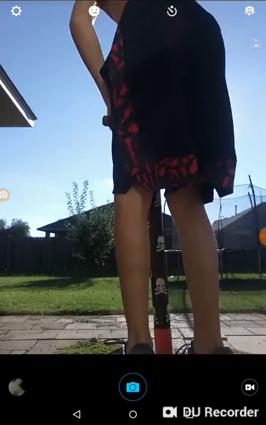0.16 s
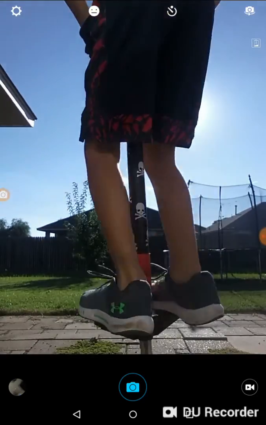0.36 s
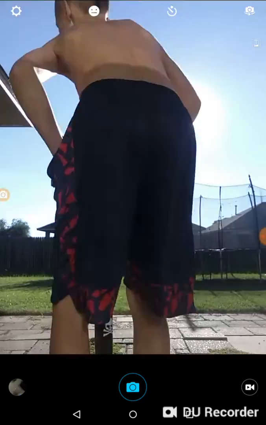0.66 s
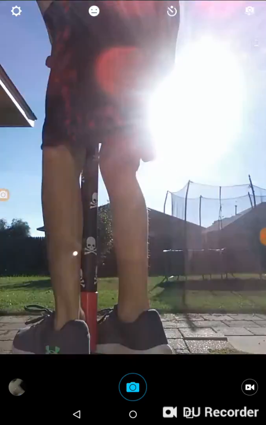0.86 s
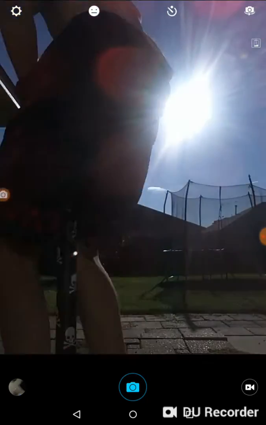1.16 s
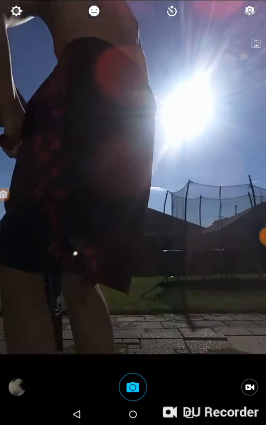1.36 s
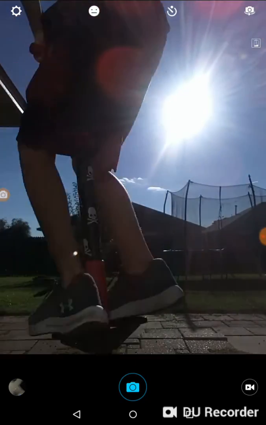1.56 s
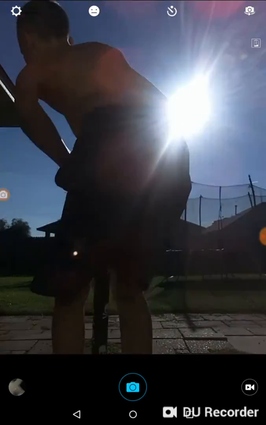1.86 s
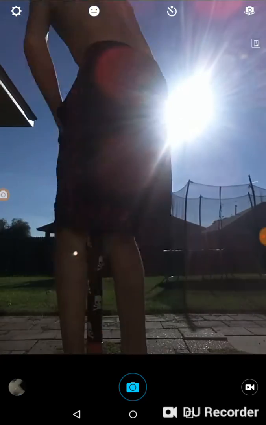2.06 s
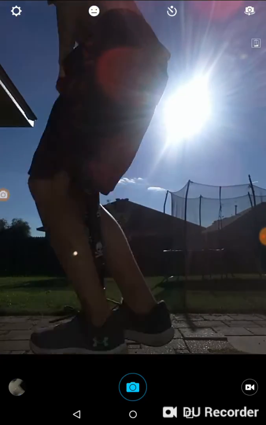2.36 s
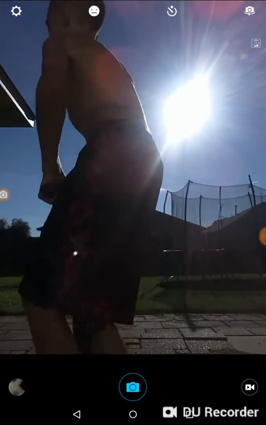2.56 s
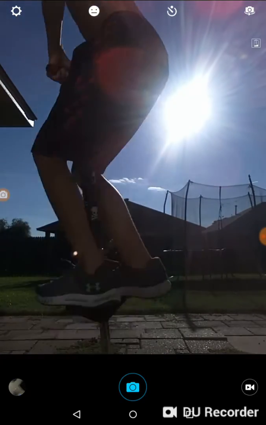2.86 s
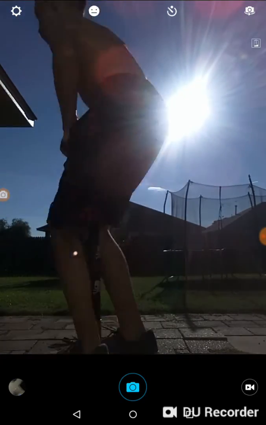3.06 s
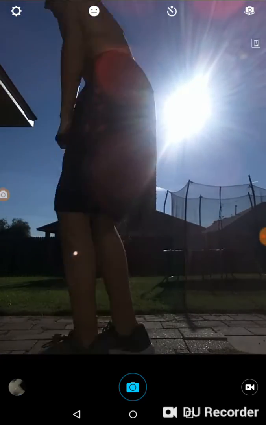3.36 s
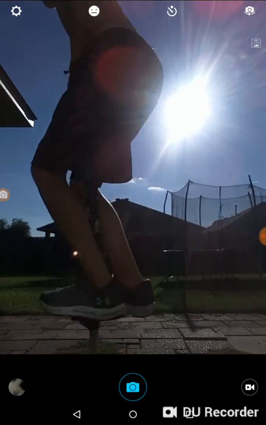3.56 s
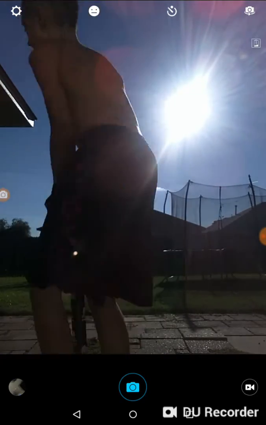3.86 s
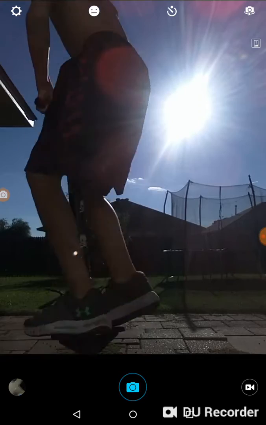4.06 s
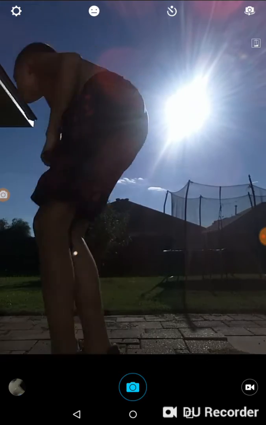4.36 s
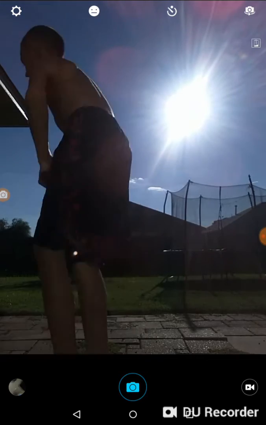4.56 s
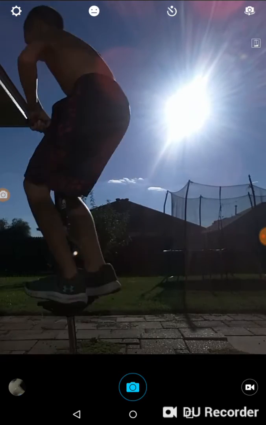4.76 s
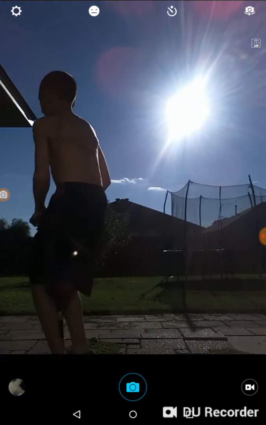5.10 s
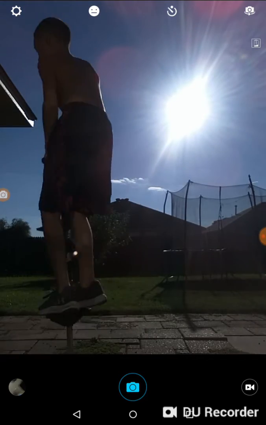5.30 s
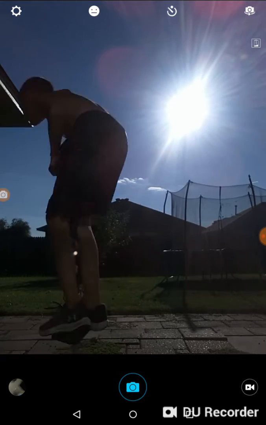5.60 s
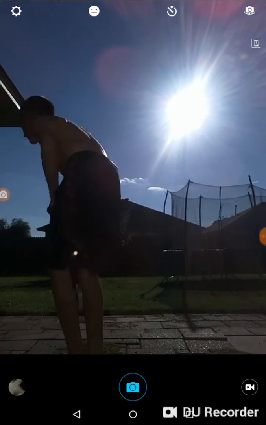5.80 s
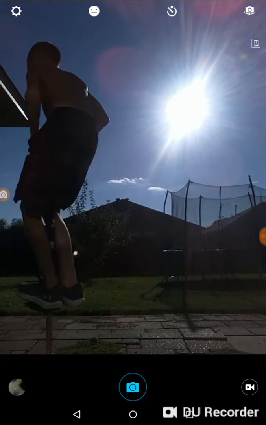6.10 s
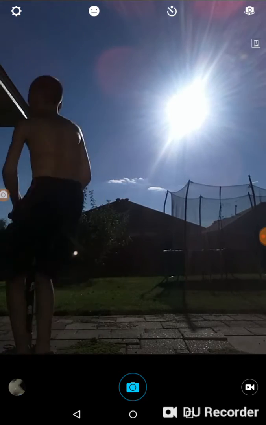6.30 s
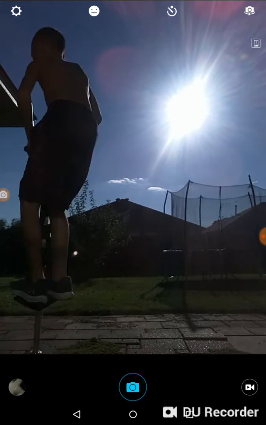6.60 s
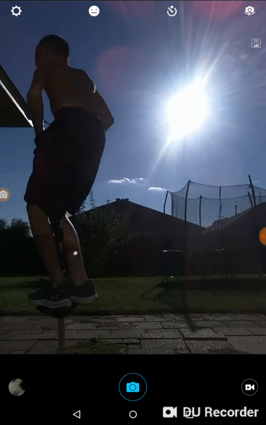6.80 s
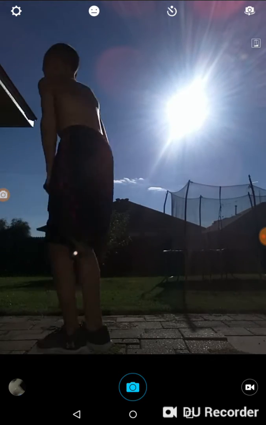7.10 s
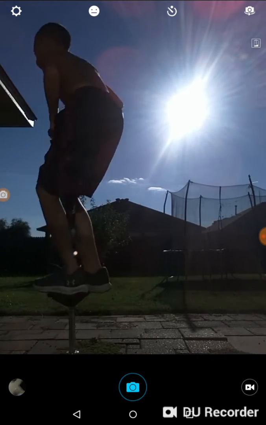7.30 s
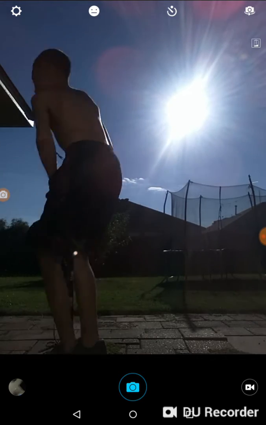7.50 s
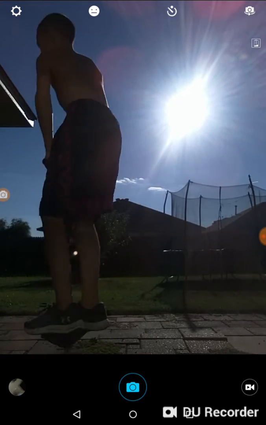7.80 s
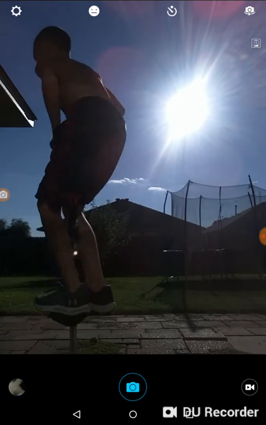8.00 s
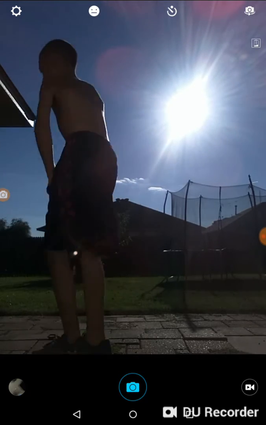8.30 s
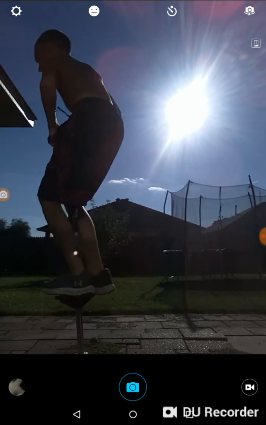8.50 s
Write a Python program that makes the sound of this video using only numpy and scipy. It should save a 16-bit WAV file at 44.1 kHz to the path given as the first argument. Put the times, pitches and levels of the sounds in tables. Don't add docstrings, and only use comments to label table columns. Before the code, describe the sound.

A pogo stick bounces steadily on patio slabs, each landing a sharp metallic clack with spring chatter, a dull thud and a rattling top-stop slam.

```python
import sys
import numpy as np
from scipy import signal
from scipy.fft import rfft, irfft
from scipy.io import wavfile
from scipy.ndimage import uniform_filter1d, minimum_filter1d

SR = 44100
rng = np.random.default_rng(int(sys.argv[2]) if len(sys.argv) > 2 else 0)


def volts_from_db(level):
    exponent = np.asarray(level, float) / 20
    return 10 ** exponent


def log_audio(samples):
    frames = np.atleast_2d(samples).T
    limited = np.clip(frames, -1, 1)
    pcm = np.round(limited * 32767).astype(np.int16)
    wavfile.write(sys.argv[1], SR, pcm)


N = 381465

# start_s, peak_db, bright_db, chatter_held_s, chatter_t60_s (time to die by 60 dB)
TOP_STOPS = [(0.149, -8, -5, 0.0085, 0.14), (0.794, -11.5, -10.5, 0.0048, 0.21),
             (1.448, -4.5, -8, 0.0074, 0.1), (2.093, -7, -3.5, 0.0037, 0.113),
             (2.723, -13.5, -12, 0.014, 0.23), (3.362, -13.5, -14, 0.012, 0.19),
             (4.0, -11.5, -9.5, 0.007, 0.2), (4.629, -9.5, -9, 0.0039, 0.2),
             (5.261, -11, -10.5, 0.0049, 0.183), (5.911, -8.5, -11.5, 0.0032, 0.17),
             (6.513, -6.5, -4.5, 0.0015, 0.15), (7.142, -10.5, -7, 0.0043, 0.16),
             (7.751, -11, -12, 0.0061, 0.17), (8.354, -14, -9.5, 0.011, 0.18)]
# full_drag_s, rub_db, whine_db
REBOUNDS = [(0.127, -35, -42.5), (0.731, -35, -47), (1.39, -37.5, -39.5), (2.04, -37.5, -61.5),
            (2.67, -37.5, -51.5), (3.28, -39.5, -42), (3.97, -36, -56.5), (4.57, -40, -60),
            (5.16, -40, -56.5), (5.849, -45, -64), (6.47, -41, -54.5), (7.1, -37, -45), (7.71, -38.5, -55),
            (8.28, -42.5, -54)]
# rub_settles_s, rub_db, whine_settles_s, whine_db
FLIGHTS = [(.31, -46, 0.53, -60.5), (.94, -44, 0.892, -47), (1.62, -38, 2.4, -52),
           (2.21, -40, 2.917, -46.5), (2.86, -41, 3.3, -65.5), (3.51, -43, 4, -63),
           (4.12, -51.5, 6.6, -60.5), (4.77, -48, 4.7, -51), (5.45, -47, 5.4, -42), (5.97, -42.5, 4.3, -45),
           (6.58, -35.5, 6.64, -45), (7.279, -44, 7.4, -54), (7.878, -44.5, 5.3, -61),
           (8.41, -39.5, 7.76, -47)]
# pitch_hz, width_hz, level_db
TUBE_FREE = [(803, 100, 2), (1274, 110, 5), (1570, 200, 3.5), (2210.5, 190, 2.5), (3280, 670, -6.5),
             (4080, 630, 3), (5720, 190, 1.5), (6420, 170, -1), (7680, 280, -1.5), (9800, 350, -5)]
# pitch_hz, width_hz, level_db
TUBE_LOADED = [(730, 92, -3), (1256.5, 49, 0), (1490, 210, -1), (2083, 32, 3), (2350, 150, -2),
               (3680, 300, 1), (4340, 140, 1.5), (5600, 120, -1.5), (6100, 500, -7.5), (7330, 570, -5.5),
               (8890, 1100, -10)]
# pitch_hz, width_hz, level_db
PEG_TONES = [(732.5, 66, 14), (1280, 100, 13.5), (1582, 600, 12.5), (1750, 72, -16.5)]
# pitch_hz, level_db (per Hz)
STEEL_COLOUR = [(250, -17), (600, -6), (1100, -14), (2000, -11), (2800, -9.5), (4000, -7), (5500, -14),
                (8000, -14), (12000, -25), (16000, -36.5)]
# pitch_hz, level_db (per Hz)
SIZZLE_COLOUR = [(3000, -25), (6000, -5), (8500, 3), (11000, 0), (13000, -9), (16000, -27.5)]
# pitch_hz, level_db (per Hz)
RUBBER_COLOUR = [(250, -16), (600, -6), (1600, -10), (2100, -22), (4000, -34), (16000, -55)]
# pitch_hz, level_db (per Hz)
CLINK_COLOUR = [(1500, -67), (3000, -2.5), (4200, 2), (5200, -2), (8000, -3), (11000, -7.5), (13000, -23),
                (16000, -19.5)]


def rms_one(x):
    return x / np.sqrt(np.mean(x ** 2) + 1e-20)


def colour(x, broad=None, peaks=(), peak_db=0, size=4096):
    hz = np.arange(size // 2 + 1) * SR / size + 1e-3
    power = np.full(len(hz), 1e-7)
    if broad:
        broad_hz, broad_db = np.transpose(broad)
        power = power + volts_from_db(np.interp(np.log(hz), np.log(broad_hz), broad_db)) ** 2
    for centre, width, db in peaks:
        power = power + volts_from_db(db + peak_db) ** 2 / (1 + ((hz - centre ** 2 / hz) / width) ** 2)
    cepstrum = irfft(np.log(power / power.mean()) / 2, size)
    cepstrum[1:size // 2] *= 2
    cepstrum[size // 2 + 1:] = 0
    response = irfft(np.exp(rfft(cepstrum)), size)
    return signal.oaconvolve(x, response)[:len(x)]


def wander(size, low_hz, high_hz):
    band = signal.butter(1, [low_hz, high_hz], "band", fs=SR / 10, output="sos")
    slow = signal.sosfilt(band, rng.standard_normal(size // 10 + 1))
    return rms_one(slow).repeat(10)[:size]


def swell(starts, ends, levels_db, rise_db_s, fall_db_s, rest_db):
    t = np.arange(0, N + 64, 64) / SR
    each = []
    for start, end, db in zip(starts, ends, levels_db):
        each.append(db - rise_db_s * np.maximum(start - t, 0) - fall_db_s * np.maximum(t - end, 0))
    return np.interp(np.arange(N) / SR, t, volts_from_db(np.max(each, axis=0)) + volts_from_db(rest_db))


def contacts(size, per_s, uneven_db):
    strength = volts_from_db(uneven_db * np.minimum(rng.exponential(1, size), 3))
    clicks = strength * rng.choice([-1, 1], size) * (rng.random(size) < per_s / SR)
    return rms_one(clicks + 0.34 * rng.standard_normal(size))


def bounces():
    # peak_s, level_db (over the chatter)
    after_landing = [(0.5451, 10), (0.5562, 6.5), (0.581, 3), (0.5963, 0.5), (1.1811, 2.5), (1.1979, 8.6),
                     (1.2016, 2.5), (1.8496, 10), (1.8639, 8), (1.8766, 4.0), (2.4744, 4), (2.4878, -15.5),
                     (2.499, 4.5), (2.5287, 5.3), (3.1159, -0.5), (3.1219, 10), (3.1258, 10), (3.1619, 2),
                     (3.7329, 10), (3.7438, 2.5), (3.7561, 10), (3.767, 4.6), (4.3913, 0), (4.4035, 3.9),
                     (4.4208, 9.5), (5.0251, 6.5), (5.6615, 2), (5.6784, 4), (5.7158, 6), (6.2606, -1.5),
                     (6.2765, 5), (6.2898, 1), (6.3039, -4), (6.9104, 6), (6.9401, -7), (7.5126, 4.5),
                     (7.5322, 9), (7.55, 0.5), (7.5646, -3), (8.1176, 2), (8.1261, 4.5), (8.1505, 1),
                     (8.1637, -2.5)]
    # peak_s, level_db (over the chatter)
    after_top = [(0.2139, 6.8), (0.2256, 4.0), (0.2545, 4.4), (0.8296, 3.7), (0.8487, 8), (0.8724, 5.8),
                 (0.8934, 6.4), (1.4549, 3.37), (1.4613, 3.4), (1.4805, 4.4), (1.493, 6.3), (1.5317, 5.9),
                 (1.5466, 3.9), (1.5596, 3.5), (2.1114, 3.1), (2.129, 7.2), (2.1604, 7.3), (2.1778, 4.4),
                 (2.1918, 4.2), (2.7343, 4.8), (2.748, 6.3), (2.7577, 7.3), (2.7687, 4.2), (2.8123, 3.8),
                 (3.388, 3), (3.407, 5.2), (3.4171, 5.2), (3.4258, 3.6), (3.4333, 3.7), (3.4546, 4.9),
                 (4.0169, 3.9), (4.0544, 2.6), (4.0657, 2.6), (4.083, 4.4), (4.0979, 12), (4.6879, 2.6),
                 (4.7053, 4.3), (4.7355, 11), (5.27, 4.5), (5.278, 3.5), (5.3061, 3.6), (5.3168, 3.4),
                 (5.3444, 3.6), (5.3643, 5.4), (5.92, 5.5), (5.9383, 3.8), (5.9742, 4.5), (5.9994, 7.7),
                 (6.0078, 4.1), (6.5238, 6.3), (6.536, 3.2), (6.5646, 4.8), (6.6085, 5), (7.2086, 5.2),
                 (7.2323, 6.5), (7.8017, 2.7), (7.8306, 4.7), (8.3818, 2.8), (8.4205, 2.54), (8.4339, 4.9)]
    rise_s, fall_s = 0.002, 0.0037
    t, db = np.arange(N + SR) / SR, np.zeros(N + SR)
    for s, over_db in [*after_landing, *after_top]:
        near = slice(round((s - .01) * SR), round((s + .03) * SR))
        away = np.maximum((s - t[near]) / rise_s, (t[near] - s) / fall_s)
        db[near] = np.maximum(db[near], over_db * np.exp(-away))
    return volts_from_db(db)


def varied(peaks, pitch_spread):
    return [(hz * (1 + pitch_spread * rng.standard_normal()), width, db + 1.5 * rng.standard_normal())
            for hz, width, db in peaks]


def slab_thump(size, thump_t60, rebound, thump_lag_s, answer):
    # pitch_hz, width_hz, level_db
    slab_tones = [(152.3, 12, 0), (190, 14, -2), (257, 70, -2.5), (363, 270, -5), (533, 72, -10.5),
                  (720, 72, -6.5)]
    main_hz, rock_1_s, rock_2_s = answer
    contact_s, push_s = .0008, .0011
    push = .5 * rng.standard_normal(size) * volts_from_db(-60 * np.arange(size) / SR / thump_t60)
    push[round(contact_s * SR)] -= 25
    push[round((contact_s + rock_1_s) * SR)] -= rebound
    push[round((contact_s + rock_2_s) * SR)] -= 0.96 * rebound
    soft = np.hanning(round(push_s * SR) + 3)
    push = np.convolve(push, soft / soft.sum())[len(soft) // 2:]
    push = np.r_[np.zeros(round(thump_lag_s * SR)), push][:size]
    return colour(push, peaks=varied(slab_tones, .05) + [(main_hz, 42, 2.5)])


def blows(rows, body, bright, gains_db, per_s, uneven_db, rise_s, bright_share, thump_t60, rebound, size,
          touch, thump_lag_s=0, lag_s=0, rings=None, clinks=None, bounce=None, thumps=None):
    out, t = np.zeros(N + SR), np.arange(size) / SR
    broad, peaks, ring_db = body
    clump_db = 2.4 if bounce is None else .8
    for k, (s, db, thump_db, bright_db, held, t60) in enumerate(rows):
        at = round(s * SR)
        clumps = volts_from_db(clump_db * wander(size, 40, 200) * np.minimum(t / .005, 1))
        chatter = contacts(size, per_s, uneven_db) * clumps
        chatter *= np.clip((t - lag_s) / rise_s + 0.077, 0, 1)
        if bounce is not None:
            chatter *= bounce[at:at + size]
        chatter[round((lag_s + .0004) * SR)] += touch
        dying = volts_from_db(-60 * np.maximum(t - held, 0) / t60)
        dying_bright = volts_from_db(-60 * np.maximum(t - bright_share * held, 0) / (bright_share * t60))
        chatter /= np.sqrt(np.sum((chatter * dying) ** 2) / np.sum(dying ** 2))

        struck, glint = varied(peaks, .015), []
        if rings is not None:
            middle_hz, middle_db, high_hz, high_db = rings[k]
            struck += [(middle_hz, 71, middle_db), (high_hz, 120, high_db)]
        if clinks is not None:
            glint = [(clinks[k][0], 2100, clinks[k][1])]
        main_hz, more_db, *rocks = (257, 0, .009, .016) if thumps is None else thumps[k]

        body_gain, thump_gain, bright_gain = volts_from_db(np.array([db, thump_db + more_db, bright_db]) + gains_db)
        blow = body_gain * colour(chatter * dying, broad, struck, ring_db)
        blow += thump_gain * slab_thump(size, thump_t60, rebound, thump_lag_s, (main_hz, *rocks))
        flipped = chatter * dying_bright * rng.choice([-1, 1], size)
        blow += bright_gain * colour(flipped, bright, glint, 1.5)
        if lag_s > 0:
            swing = np.sin(np.linspace(0, 2 * np.pi, round(2 * .0014 * SR)))
            blow[:len(swing)] -= volts_from_db(3.5) * thump_gain * swing
        out[at:at + size] += blow
    return out[:N]


def garden():
    # pitch_hz, level_db (per Hz)
    air_colour = [(15, -50), (30, 3.5), (100, 12), (700, 12), (1100, -18), (6000, -17), (11000, -4),
                  (16000, -6)]
    return volts_from_db(-67) * colour(rng.standard_normal(N), air_colour, size=16384)


def shudder():
    # deepest_load_s, level_db
    loads = [(0.01, -29.5), (.63, -25.5), (1.28, -30.5), (1.9, -27.5), (2.55, -30), (3.203, -26),
             (3.82, -33.5), (4.48, -30.5), (5.08, -32), (5.76, -29), (6.38, -36.5), (6.99, -33),
             (7.59, -29.5), (8.16, -32.5)]
    # pitch_hz, width_hz, level_db
    frame_tones = [
        (69.5, 13, 8.5),
        (126.2, 10, 3.6),
    ]
    deepest, load_db = np.transpose(loads)
    load = swell(deepest, deepest, load_db, rise_db_s=181.5, fall_db_s=180, rest_db=-51.5)
    return volts_from_db(-7) * load * colour(rng.standard_normal(N), peaks=frame_tones, size=32768)


def flight_hum():
    # middle_s, level_db
    hums = [
        (.30, -59),
        (.94, -52.5),
        (1.619, -49),
        (2.251, -54),
        (2.879, -57),
        (3.51, -58),
        (4.15, -77),
        (7.27, -60),
        (8.504, -58.5),
    ]
    hum_hz, half_s = 374.5, 0.036
    out, t = np.zeros(N + SR), np.arange(-.1, .1, 1 / SR)
    for s, db in hums:
        at = round((s + t[0]) * SR)
        tone = np.sin(2 * np.pi * hum_hz * t + rng.uniform(0, 2 * np.pi))
        out[at:at + len(t)] += volts_from_db(db) * np.exp(-(t / half_s) ** 2) * tone
    return out[:N]


def coil_whine():
    # pitch_hz, width_hz, level_db
    coil_tones = [(448, 19, -2.5), (1320, 120, -7.5), (2090, 180, -4.5), (2405, 260, -6), (4150, 300, -7),
                  (5740, 400, -12)]
    drag, _, drag_db = np.transpose(REBOUNDS)
    _, _, fade, shake_db = np.transpose(FLIGHTS)
    top = np.array(TOP_STOPS)[:, 0]
    whining = swell(np.r_[drag, top], np.r_[top, fade], np.r_[drag_db, shake_db],
                    rise_db_s=146, fall_db_s=126, rest_db=-81.5)
    stirred = rng.standard_normal(N) * volts_from_db(3.4 * wander(N, 5, 40))
    whine = colour(colour(stirred, peaks=coil_tones), peaks=coil_tones)
    return volts_from_db(-9.5) * whining * rms_one(whine)


def coil_rub():
    slips = contacts(N, 5000, 1.2) * volts_from_db(2 * wander(N, 32, 120) + 2 * wander(N, 8, 25))
    slips = slips * bounces()[:N]
    lean = volts_from_db(1.1 * wander(N, 7.2, 14))
    rub = colour(slips * lean, STEEL_COLOUR, TUBE_FREE, peak_db=-4.5)
    rub += colour(slips * rng.choice([-1, 1], N) / lean, STEEL_COLOUR, TUBE_LOADED, peak_db=-11.5)
    return rub / np.sqrt(lean ** 2 + lean ** -2)


def coil_creak():
    # start_hz, end_hz, level_db
    creak_glides = [(1311.6, 1356, -2.5), (1571, 1270, -0.5), (1243.3, 1571, 0), (1262.2, 1227, -3),
                    (1329, 1658, 1), (1700, 1485, 2.5), (1290, 1248, 0), (1614, 1248, 0), (1510, 1400, 2),
                    (1635, 1399, -1.0), (1571, 1300, -3), (1460, 1300, -1.0), (1550, 1399, 1),
                    (1399, 1528, -2)]
    # width_hz, heard_s (before the stop), glide_s, level_db (over the scrape)
    creak_settings = (90.5, .37, .08, -6)
    width_hz, heard_s, glide_s, creak_db = creak_settings
    stops, t = np.array(TOP_STOPS)[:, 0], np.arange(N) / SR
    coming = np.searchsorted(stops, t)
    to_go = np.append(stops, t[-1] + 1)[coming] - t
    low_hz, high_hz, own_db = np.array(creak_glides)[np.minimum(coming, len(stops) - 1)].T
    opening = np.clip(1 - to_go / glide_s, 0, 1)
    turn = np.exp(2j * np.pi * np.cumsum(low_hz + (high_hz - low_hz) * opening) / SR)
    low_pass = signal.butter(2, width_hz, fs=SR, output="sos")
    wobble = signal.sosfilt(low_pass, rng.standard_normal((2, N)))
    creak = rms_one(np.real((wobble[0] + 1j * wobble[1]) * turn))
    return volts_from_db(creak_db + own_db) * creak * np.clip(2.5 - 1.3 * to_go / heard_s, 0, 1)


def scrape():
    drag, drag_db, _ = np.transpose(REBOUNDS)
    settle, shake_db, _, _ = np.transpose(FLIGHTS)
    top = np.array(TOP_STOPS)[:, 0]
    ends = np.r_[np.maximum(top - 0.016, drag), settle]
    rubbing = swell(np.r_[drag, top], ends, np.r_[drag_db, shake_db],
                    rise_db_s=257.5, fall_db_s=282.5, rest_db=-71)
    return volts_from_db(-3.5) * rubbing * (coil_rub() + coil_creak())


def ticks_and_rattles():
    # start_s, peak_db, thump_db, bright_db
    slip_list = [(0.035, -26, -38, -29.5), (0.114, -24.5, -35.5, -52.5), (.507, -50, -54.5, -65),
                 (0.677, -41, -49, -36), (.761, -26.5, -40, -43.5), (1.197, -31.5, -16, -13),
                 (1.321, -35.5, -58.5, -53.5), (2.001, -34, -34, -39), (2.451, -50, -44, -55.5),
                 (2.653, -29.5, -47, -39), (3.247, -54, -57, -34.5), (3.877, -42, -35.5, -39.5),
                 (4.526, -40.5, -43.5, -36), (4.619, -38.5, -58, -31.5), (4.969, -47.5, -62, -57),
                 (5.229, -27.5, -33.5, -45), (6.485, -24, -54.5, -35), (7.089, -31, -50.5, -33.5),
                 (7.528, -20, -46, -23.5), (7.715, -28, -48.5, -57), (8.238, -28, -39.5, -36)]
    # start_s, peak_db, bright_db, t60_s
    rattle_list = [(0.323, -37, -36, 0.084), (0.405, -44, -59.5, 0.033), (0.872, -27.5, -29.5, 0.022),
                   (1.605, -35, -34.5, 0.131), (1.619, -36, -33.5, 0.022), (1.67, -38, -39.5, 0.035),
                   (1.713, -41.5, -44, 0.12), (2.157, -28.5, -30.5, 0.1), (2.176, -39, -34, 0.1),
                   (2.895, -47, -41.5, 0.2), (2.993, -46, -50, 0.15), (4.305, -38.5, -48, 0.16),
                   (4.336, -31.5, -31, 0.13), (4.898, -39, -53, 0.12), (5.436, -29.5, -31.5, 0.047),
                   (5.443, -27.5, -26, 0.13), (5.461, -33, -36.5, 0.2), (5.497, -39, -39, 0.097),
                   (5.566, -40, -48, 0.097), (6.084, -35.5, -38, 0.16), (8.535, -56, -55, 0.145),
                   (1.97, -53, -39, .08), (1.338, -56, -48, 0.085), (2.908, -53.5, -55, .08),
                   (4.258, -60.5, -56, .06), (1.531, -43, -34.5, 0.053), (1.546, -45, -32, .15),
                   (1.586, -48, -36.5, 0.053)]
    # pitch_hz, level_db
    slip_clinks = [(8010, -1), (7795, -1.5), (8570, 3), (7140, 0), (6115, -0.5), (4177, -1), (8225, -7),
                   (5813, 1.5), (9560, -4.5), (9870, -3.5), (7260, 8), (10465, -3), (4740, 0), (4220, 2),
                   (4091, -1.5), (6287, 3.5), (8914, 0), (4580, -2.5), (4135, 8), (2540, -1), (4694, -5)]
    # pitch_hz, level_db
    rattle_clinks = [(7795, 0), (4460, 0), (4608, 0.003), (6416, 0), (6244, 0), (4091, 0), (4177, 0),
                     (4651, 0), (8527, 0), (9948, 0), (8570, 0), (7420, 0.0077), (4005, 0.0054), (4048, 0),
                     (4134, 0), (3960, 0), (7400, 0), (4024, 0), (4177, 0), (4250, 0.005), (4263, 0),
                     (4694, 0), (4866, 0.0028), (11369, 0), (9302, 0.0057)]
    # pitch_hz, level_db
    other_clink = (6900, 1.5)
    held_s, slip_t60_s = 0.0007, 0.079
    rows = [(*row, held_s, slip_t60_s) for row in slip_list]
    rows += [(s, db, db - 17.5, bright_db, held_s, t60) for s, db, bright_db, t60 in rattle_list]
    clinks = [*slip_clinks, *rattle_clinks]
    clinks += [other_clink] * (len(rows) - len(clinks))
    return blows(rows, (RUBBER_COLOUR, PEG_TONES, -1.5), CLINK_COLOUR, [-6, -9, 1.5], per_s=4700,
                 uneven_db=2.3, rise_s=0.00091, bright_share=0.55, thump_t60=.05, rebound=6.1,
                 size=5000, touch=4.4, clinks=clinks)


def top_stops():
    # middle_hz, middle_db, high_hz, high_db
    stop_rings = [(1280, 0.0031, 4100, 0.0021), (2202, 0, 3400, 0), (1550, 0, 3887, 0.002),
                  (1270, 0, 1800, 0), (1583, 0, 5400, 0.0035), (1270, 0, 3500, 0), (1523, 0, 1200, 0.0021),
                  (1276, 0, 4199, 0.0072), (1626, 0, 3698, 0), (1500, 0, 3300, 0.0027), (1626, 0, 4300, 0),
                  (1360, 0, 3400, 0), (1475, 0, 3370, 0), (1523, 0, 3768, 0.0079)]
    rows = [(s, db, -47.5, bright_db, held, t60) for s, db, bright_db, held, t60 in TOP_STOPS]
    return blows(rows, (STEEL_COLOUR, TUBE_FREE, -1.5), SIZZLE_COLOUR, [-3, -7.5, -6], per_s=8000,
                 uneven_db=1.9, rise_s=0.0015, bright_share=0.51, thump_t60=0.15, rebound=16,
                 size=14000, touch=1.2, rings=stop_rings, bounce=bounces())


def bottoms():
    # start_s, peak_db, thump_db (under 500 Hz), bright_db, chatter_t60_s
    bottom_list = [(0.0, -31, -43.5, -36.5, 0.36), (0.606, -13.5, -23.5, -25, 0.052),
                   (1.259, -16, -29, -56.5, 0.045), (1.905, -10.5, -25.5, -15, 0.095),
                   (2.542, -24, -33, -30, 0.075), (3.179, -10.5, -24, -11.5, 0.0646),
                   (3.812, -25.5, -38.5, -34, 0.076), (4.459, -21.5, -27.5, -32.5, 0.15),
                   (5.071, -15, -23, -18.5, 0.13), (5.73, -19.5, -28, -28.5, 0.082),
                   (6.343, -13, -27, -26, 0.091), (6.964, -9.5, -25, -17.5, 0.069),
                   (7.579, -21.5, -32, -59, 0.036), (8.184, -11, -22.5, -21, 0.11)]
    # main_hz, level_db, first_rock_s, second_rock_s
    bottom_thumps = [(145, 0.83, 0.0056, 0.029), (220, 0.89, 0.0081, 0.0075), (219, 0.87, 0.006, 0.0088),
                     (244, 0.85, 0.0085, 0.0127), (220, 0.93, 0.0064, 0.0066), (143.5, 0.68, 0.00527, 0.02),
                     (207.6, 1.0, 0.012, 0.014), (145, 0.78, 0.0044, 0.01), (263, 0.75, 0.0067, 0.012),
                     (247, 0.77, 0.011, 0.0051), (264, 0.93, 0.012, 0.011), (256, 0.86, 0.00794, 0.0078),
                     (251, 0.91, 0.0099, 0.0094), (247, 1.0, 0.0031, 0.014)]
    rows = [(s, db, thump_db, bright_db, 0.0033, t60) for s, db, thump_db, bright_db, t60 in bottom_list]
    return blows(rows, (RUBBER_COLOUR, PEG_TONES, -1.5), CLINK_COLOUR, [-9, 1.5, -1.5], per_s=4000,
                 uneven_db=4.5, rise_s=0.0062, bright_share=0.8, thump_t60=0.23, rebound=14.8,
                 size=9000, touch=1.4, thump_lag_s=.003, thumps=bottom_thumps)


def landings():
    # start_s, peak_db, bright_db, chatter_held_s, chatter_t60_s
    landing_list = [(0.524, 0.5, 2, 0.0106, 0.18), (1.165, -4, -17, 0.01, 0.18),
                    (1.809, 0, -7, 0.0067, 0.15), (2.457, -4, -11, 0.028, 0.14),
                    (3.098, -4, -31, 0.017, 0.202), (3.725, -4, -16.5, 0.0236, 0.14),
                    (4.378, -3.5, -5.5, 0.02, 0.17), (4.993, -9, -23, 0.027, 0.14),
                    (5.646, -4.5, -10.5, 0.011, 0.173), (6.248, -4.5, -29, 0.017, 0.151),
                    (6.876, -6, -5, 0.019, 0.15), (7.492, -7.5, -50, 0.00413, 0.26),
                    (8.095, -7.5, -26, 0.0067, 0.22)]
    # middle_hz, middle_db, high_hz, high_db
    landing_rings = [(1107, 1.5, 4000, -0.5), (2340, 4.5, 3187, 2.5), (1287, -1.5, 3300, -7.5),
                     (1334, -3, 3424, -1.5), (1236, 2, 3800, 2), (2300, -2.5, 4700, -4.5),
                     (2130, 3, 4177, 5), (1548, 2, 2700, -18), (1480, 7, 4264, -3.5), (2159, 6, 4097, 4.5),
                     (2213, -4, 4592, 1.5), (2160.5, -1, 3655, -2.5), (1490, 4.5, 3520, 3.5)]
    # main_hz, level_db, first_rock_s, second_rock_s
    landing_thumps = [(209, -1, 0.0097, 0.0132), (209, -3, 0.0085, 0.011), (221, -0.5, 0.0065, 0.0126),
                      (212, -2.5, 0.011, 0.0131), (242, -5.5, 0.0045, 0.0088), (218, -0.5, 0.0043, 0.013),
                      (263, -1.5, 0.0039, 0.0129), (269, -1, 0.0025, 0.018), (263.5, 0.5, 0.0038, 0.011),
                      (275.8, -1, 0.0074, 0.008), (263, 0, 0.0036, 0.0126), (253.5, -1, 0.0045, 0.009),
                      (337, -0.5, 0.00382, 0.0125)]
    rows = [(s, db, -21.5, bright_db, held, t60) for s, db, bright_db, held, t60 in landing_list]
    return blows(rows, (STEEL_COLOUR, TUBE_LOADED, -1.5), SIZZLE_COLOUR, [-11, 1.5, -10.5], per_s=8000,
                 uneven_db=3.4, rise_s=0.00061, bright_share=0.095, thump_t60=0.36, rebound=19,
                 size=14000, touch=10.5, lag_s=.0009, rings=landing_rings, thumps=landing_thumps,
                 bounce=bounces())


def walls(x):
    split_hz, dull_t60_s, treble_t60_s = 10000, 0.37, 0.24
    t = np.arange(SR // 2) / SR
    noise = rng.standard_normal(len(t)) * np.clip((t - .004) / 0.033, 0, 1)
    dull = signal.sosfilt(signal.butter(2, [300, split_hz], "band", fs=SR, output="sos"), noise)
    treble = signal.sosfilt(signal.butter(2, split_hz, "high", fs=SR, output="sos"), noise)
    scatter = dull * volts_from_db(-60 * t / dull_t60_s) + treble * volts_from_db(4.5 - 60 * t / treble_t60_s)
    return volts_from_db(-17) * signal.fftconvolve(x, scatter / np.sqrt(np.sum(scatter ** 2)))[:N]


def scene():
    background = garden() + shudder() + flight_hum()
    coil = coil_whine() + scrape()
    stick = ticks_and_rattles() + top_stops() + bottoms() + landings()
    return (background + coil + stick + walls(stick))[None]


def band_limit(x):
    return signal.sosfilt(signal.butter(12, 16970, fs=SR, output="sos"), x)


def record(dry):
    limit, release_db_s = .61, 400
    cut = signal.sosfilt(signal.ellip(10, .5, 42, 15880, fs=SR, output="sos"), dry)
    cut = signal.sosfilt(signal.butter(2, 45, "high", fs=SR, output="sos"), cut)
    over_db = np.maximum(20 * np.log10(np.abs(cut[0]) / limit + 1e-9), 0)
    ramp = release_db_s * np.arange(N) / SR
    held_db = np.maximum.accumulate(over_db + ramp) - ramp
    ahead_db = uniform_filter1d(-minimum_filter1d(-held_db, size=41), size=21)
    return band_limit(cut * volts_from_db(-ahead_db))


dry = scene()
out = record(dry)
log_audio(out)
```